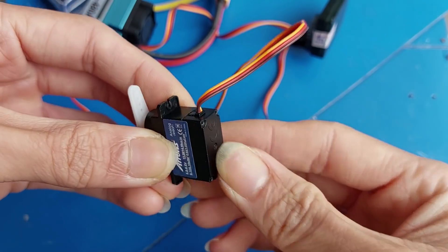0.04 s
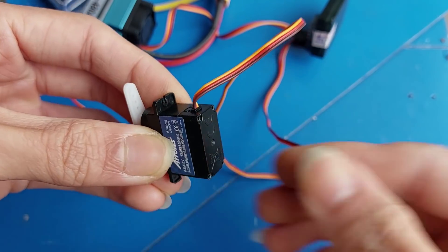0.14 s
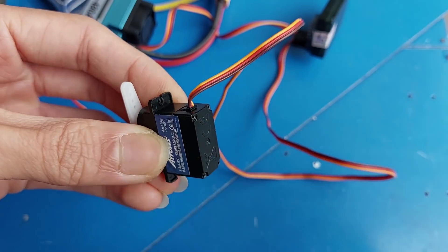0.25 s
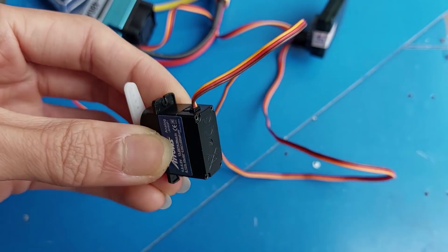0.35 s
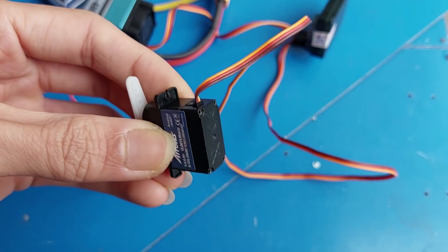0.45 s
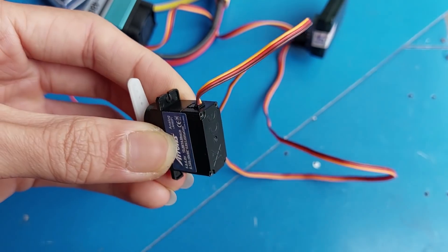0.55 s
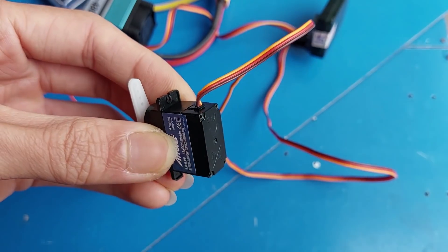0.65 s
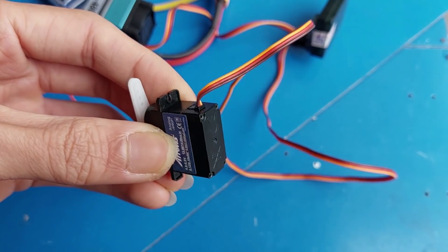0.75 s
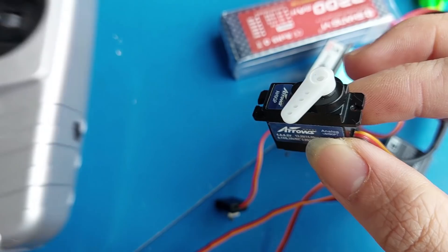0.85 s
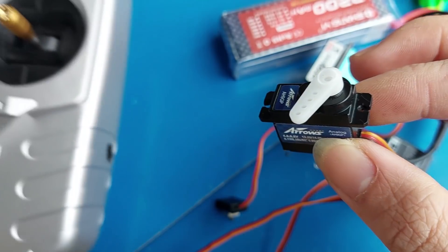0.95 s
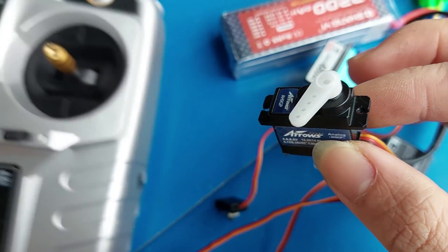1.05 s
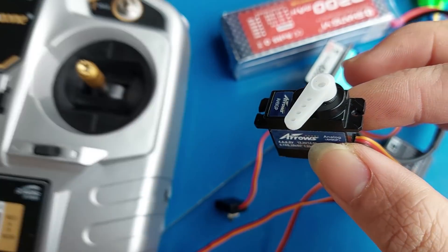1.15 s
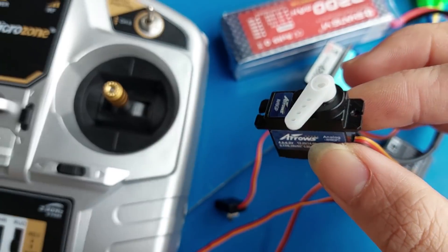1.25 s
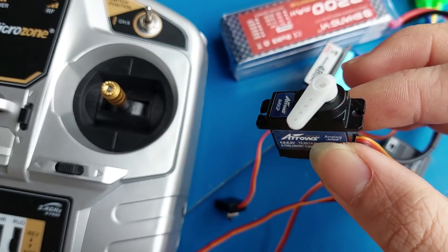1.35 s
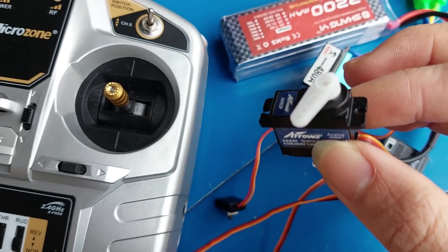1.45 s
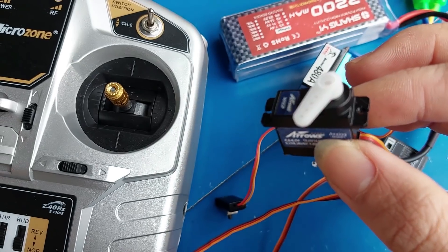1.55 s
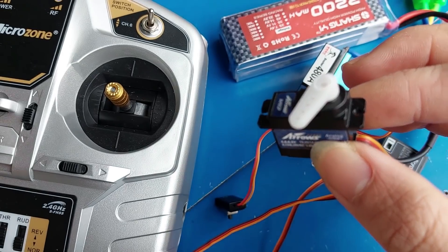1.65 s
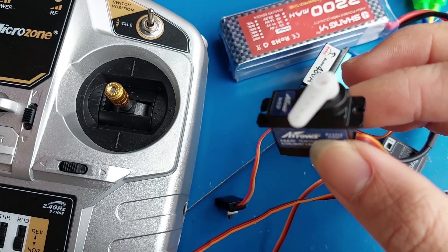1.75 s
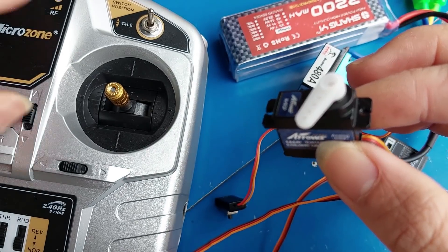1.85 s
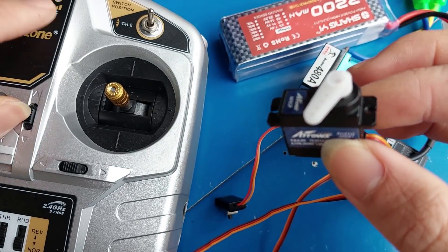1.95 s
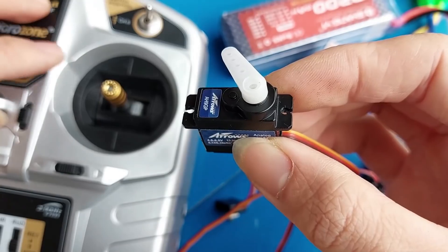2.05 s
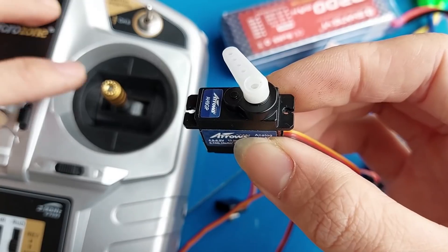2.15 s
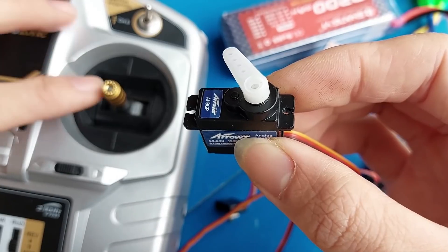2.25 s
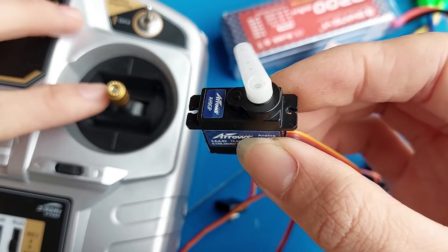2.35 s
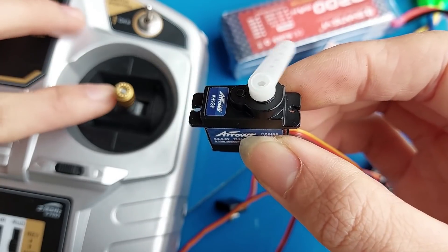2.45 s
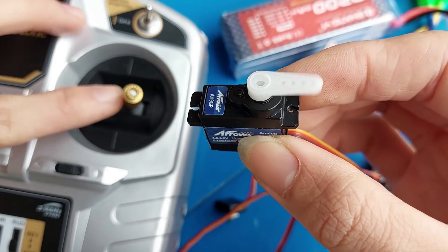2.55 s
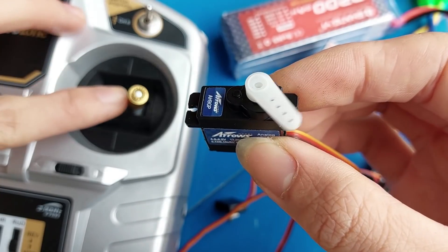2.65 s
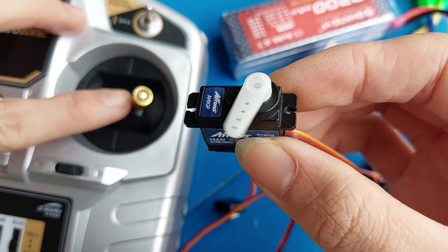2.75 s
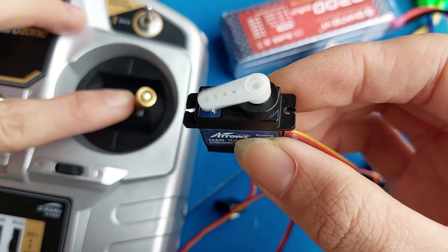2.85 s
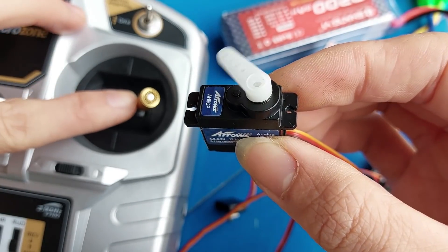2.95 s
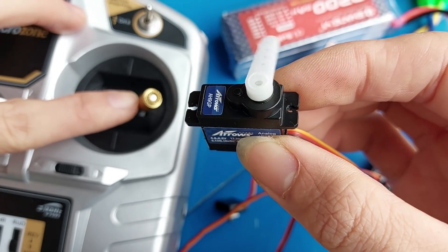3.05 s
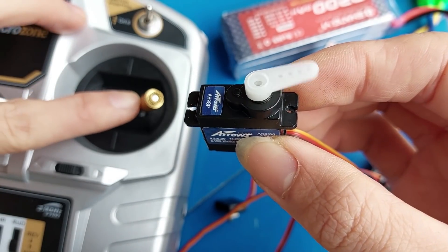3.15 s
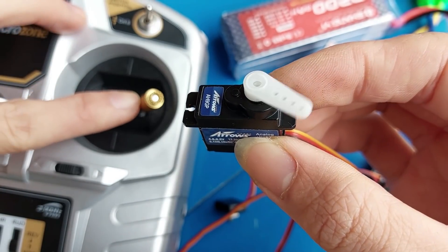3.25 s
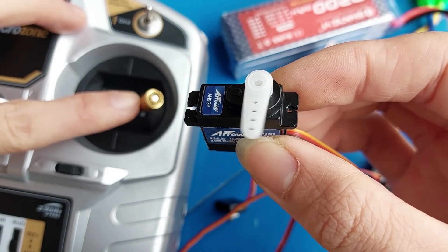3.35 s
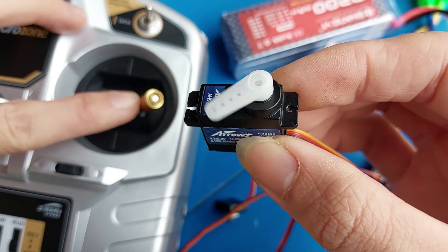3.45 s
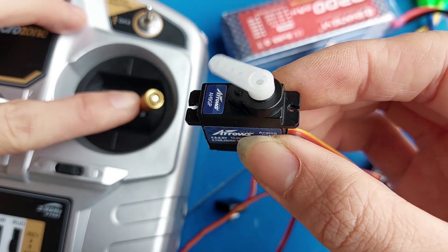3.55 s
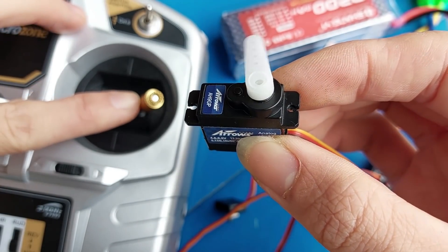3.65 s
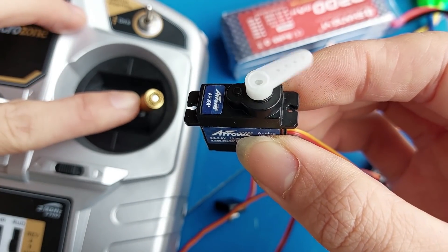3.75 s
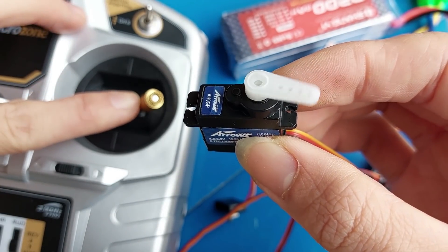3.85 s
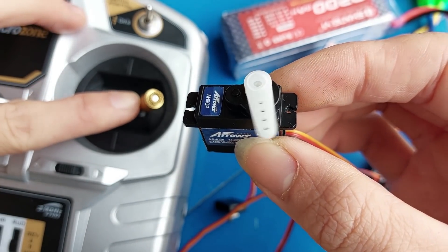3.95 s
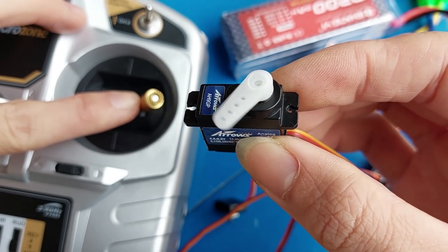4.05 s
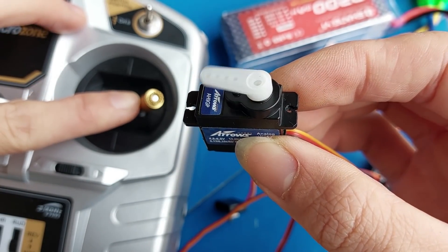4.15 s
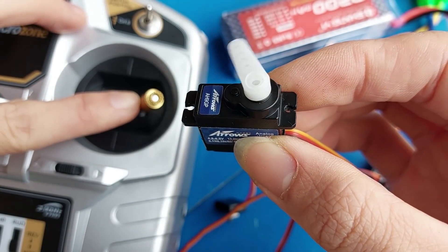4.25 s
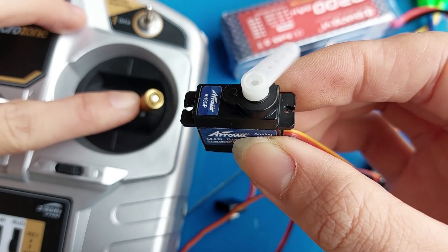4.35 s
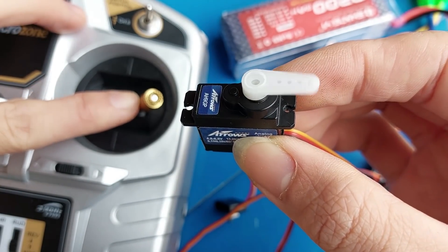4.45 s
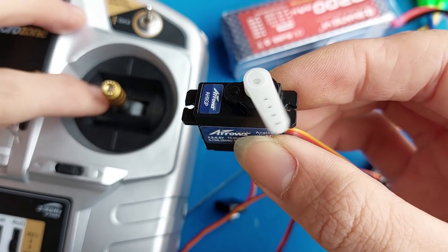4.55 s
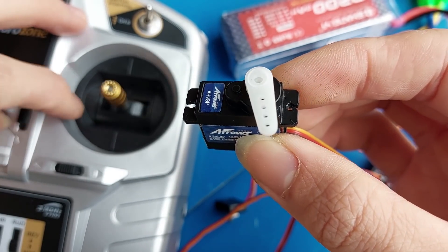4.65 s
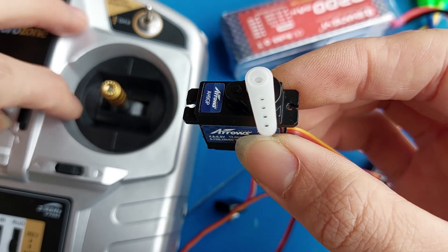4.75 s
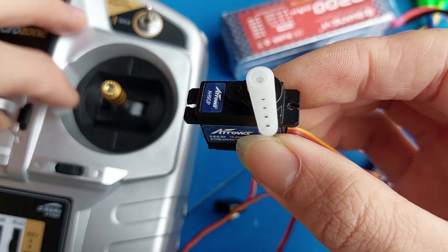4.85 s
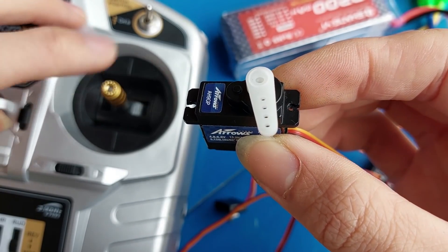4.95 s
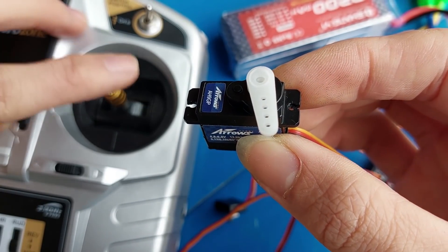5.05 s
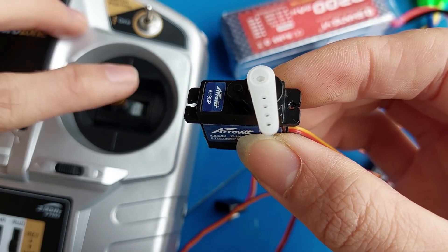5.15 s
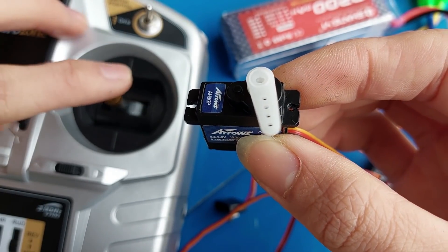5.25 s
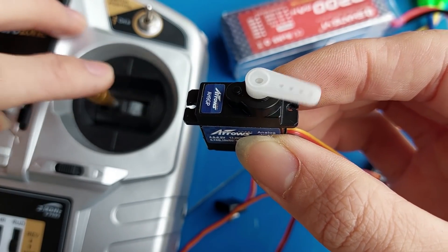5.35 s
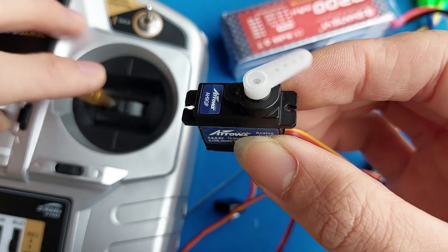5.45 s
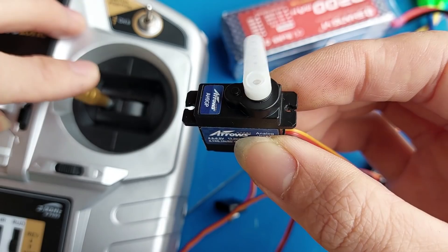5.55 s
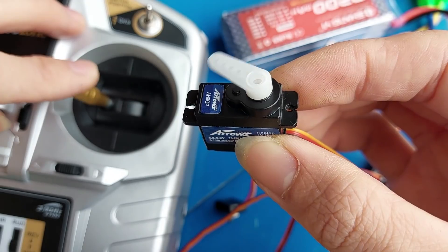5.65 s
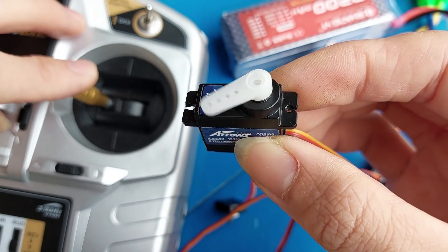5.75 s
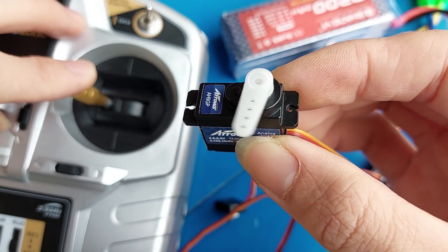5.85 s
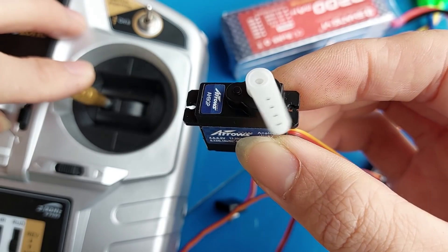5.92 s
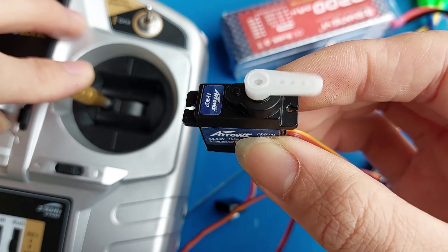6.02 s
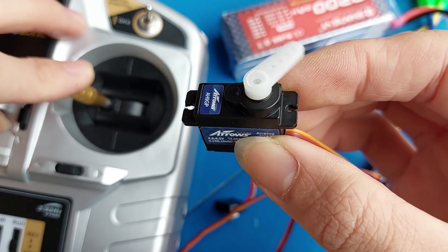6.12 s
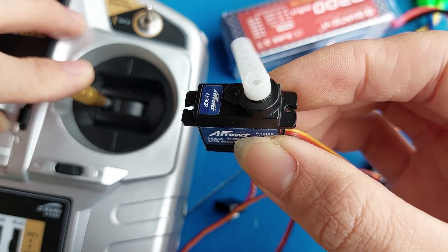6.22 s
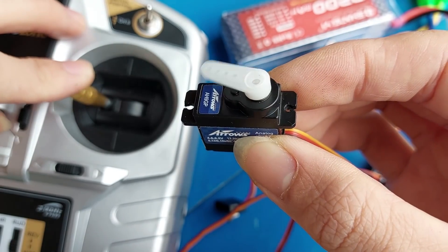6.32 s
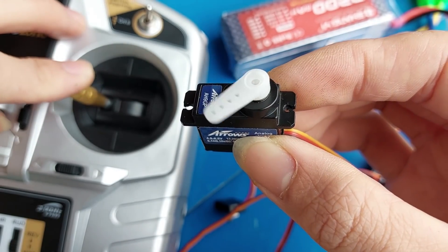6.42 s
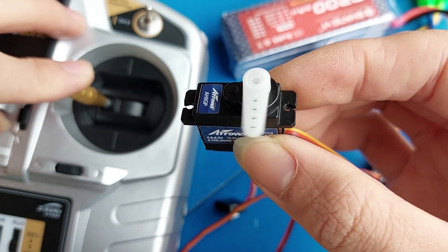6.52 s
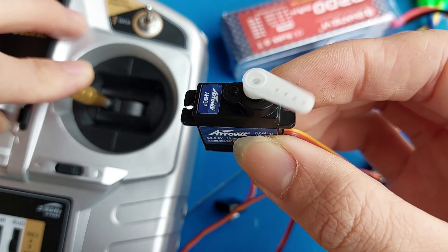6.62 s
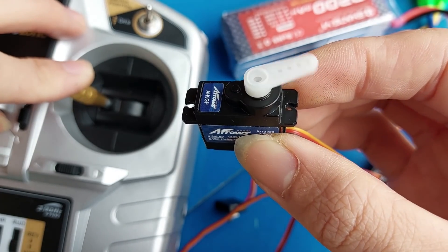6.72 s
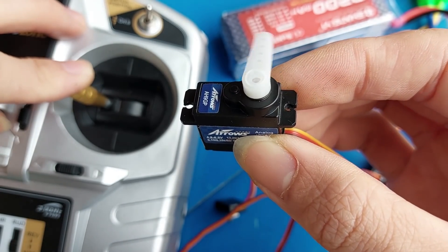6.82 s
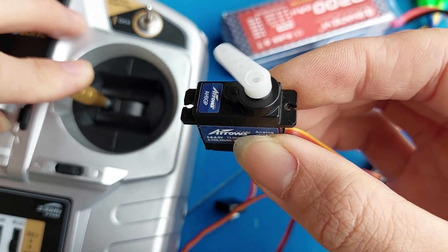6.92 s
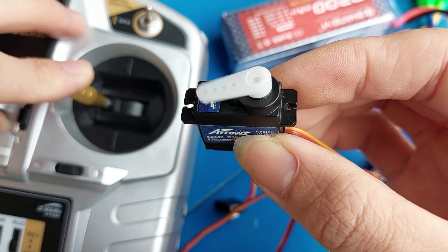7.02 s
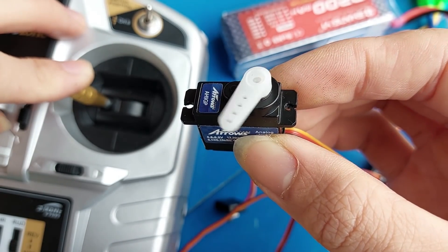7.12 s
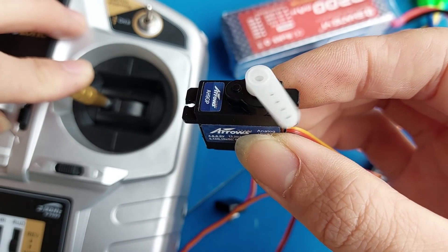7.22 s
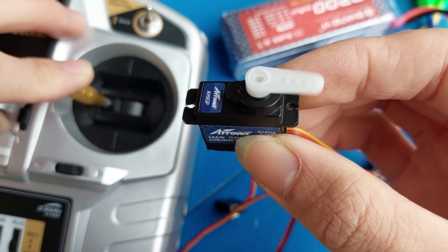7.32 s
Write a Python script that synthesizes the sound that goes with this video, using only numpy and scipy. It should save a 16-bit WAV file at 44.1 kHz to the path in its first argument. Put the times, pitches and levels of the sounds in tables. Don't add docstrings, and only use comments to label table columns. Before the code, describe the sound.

Fingers rustle faintly on a small servo, a plastic transmitter clatters onto a bench, then the motor whines in two steady gritty runs.

```python
import sys
import numpy as np
from scipy import signal
from scipy.fft import rfft, irfft, next_fast_len
from scipy.io import wavfile
from scipy.ndimage import uniform_filter1d

SR = 44100
rng = np.random.default_rng(int(sys.argv[2]) if len(sys.argv) > 2 else 0)


def gain_from_db(level_db):
    decades = np.asarray(level_db, float) / 20
    return 10 ** decades


def persist_wave(psi):
    counts = np.round(np.clip(psi, -1, 1) * 32767).astype(np.int16)
    wavfile.write(sys.argv[1], SR, np.atleast_2d(counts).T)


N = 325458
T = np.arange(N) / SR
CUT_S = (.753, .833)

# f/Hz, density/dB per Hz
ROOM_TONE = [
    [(30, -5), (50, -4), (90, 4), (160, -6.5), (260, -13), (400, -11), (600, -18.5)],
    [(30, -20.5), (50, -9.5), (90, -1), (160, 2), (260, -6.5), (400, -8), (600, -12.5)],
]
RUSTLE = [
    [(700, -7.5), (1000, -3.5), (1400, 1), (2000, -5.5), (2600, -1), (3200, -10.5), (4000, -12.5)],
    [(700, 4.5), (1000, -0.5), (1400, -3.5), (1800, -0.5), (2400, -9), (3200, -9.5), (4000, -17)],
]
FINE_HISS = [
    [(4500, 1), (6000, -2.5), (8000, 0), (10000, -2), (12500, 0), (15500, -6)],
    [(4500, -3), (6000, -5), (8900, -2), (9400, 2), (11000, 1), (13000, -4.5), (15500, -3.5)],
]
# t/s, length/s, rumble/dB, rustle/dB, fine hiss/dB
HANDS = [(.17, 0.34, -65.5, -69.5, -72), (.7, 0.45, -63.5, -78.5, -81.5), (1.15, 0.3, -56.5, -70, -76),
         (1.5, 0.12, -61, -60, -74.5), (1.92, 0.17, -60.5, -66, -80), (1.68, 0.13, -62, -66.5, -76.5),
         (2.3, 0.096, -64.5, -65.5, -78), (2.45, 2, -61.5, -84, -91), (4.61, 0.011, -57, -65, -74),
         (4.72, 0.57, -91, -82.5, -97), (4.99, 0.098, -86.5, -85, -90), (5.42, 1.9, -62.5, -84, -82),
         (6.08, 0.062, -84, -75, -95), (7.24, 0.025, -81, -62, -95)]
STILL_DB, HAND_FADE_DB_S = (-67.5, -76, -84.5), 110

# t/s, length/s, first f/Hz, last f/Hz, level/dB
IDLE = [
    [(.1, 0.47, 2695, 2750, -80), (.54, 0.11, 2710, 2705, -91), (2.06, 0.16, 1600, 1610, -76),
     (5.06, .17, 1860, 1830, -81.5)],
    [(.4, 0.21, 1290, 1244, -84), (5.09, .11, 2860, 2840, -89)],
]
# t/s, length/s, first f/Hz, last f/Hz, level/dB
CHIRPS = [(.471, 0.012, 4550, 4250, -61.5), (.487, 0.0094, 3880, 5000, -60), (.5, 0.017, 5030, 4950, -69),
          (.524, 0.013, 5300, 6700, -72), (.54, 0.047, 6430, 5400, -75), (.86, .1, 3250, 3150, -92),
          (.983, .012, 8700, 7800, -81.5), (1.06, .025, 4930, 5100, -81), (1.52, .014, 4780, 4950, -72),
          (1.915, 0.014, 8500, 7740, -74), (1.98, 0.021, 5090, 5000, -82)]

# t/s, peak/dB, thud re peak/dB, rim re peak/dB, crack re peak/dB, left - right/dB
KNOCKS = [
    (1.1302, -22.5, -10.5, -2.5, -4, 5),
    (1.139, -30, 9, -2, -21.5, -1),
    (1.1499, -34.5, 1.5, 0, -18.5, 1.5),
    (1.2345, -18.5, -10, 4, 0.5, 3.5),
    (1.253, -32.5, -4, 2.5, -20.5, -4),
    (1.296, -14.5, -11.5, -0.5, -10.5, 6),
    (1.305, -19, -11, -1, -12, 4.5),
    (1.3596, -17.5, -7.5, -0.5, -5.5, -2.5),
]
# t/s, peak/dB
THUMPS = [
    (0.948, -55.5),
    (1.189, -32),
    (1.353, -23.5),
    (2.306, -51),
    (2.333, -54),
    (2.345, -47.5),
    (4.608, -45.5),
    (4.635, -50),
]
# f/Hz, level/dB, t60/s
SHELL = [(184, -20.5, 0.048), (300, -5.5, 0.087), (445, -7, 0.033), (556.5, 1, 0.044), (760, 2, 0.036),
         (870, -4, 0.049), (1109, -5.5, 0.04)]
PLATE = [(1610, -4, .025), (1732, -1, 0.027), (2190, -0.5, 0.023), (1290, -12, .015)]
RIM = [(2370, -6.5, 0.015), (2604, 5, 0.013), (2783, -6, .015), (3210, -12, 0.0057)]
EDGE = [(3940, -4.5, 0.011), (4400, -4.5, 0.0068), (4970, -3.5, .01), (5700, -1.5, 0.0082),
        (6070, -6.5, .007), (6700, -5.5, .008), (7600, -13.5, 0.006), (8200, -10.5, .005),
        (9420, -13.5, .005), (10500, -16.5, .006), (11500, -20.5, .005), (12300, -21.5, .005),
        (14200, -17.5, .004)]
# t/s, length/s, low/dB, high/dB
DRAG = [
    (1.132, 0.026, -36, -41),
    (1.17, 0.058, -41.5, -41.5),
    (1.24, 0.045, -34.5, -39.5),
    (1.3, 0.012, -31.5, -36.5),
    (1.365, 0.014, -44, -52),
    (1.4, 0.027, -66.5, -55.5),
]
# f/Hz, density/dB per Hz
DRAG_COLOUR = [(120, -5.5), (200, 0.5), (300, 6), (500, 2), (800, 1), (1150, -6), (1400, -7), (2000, -14),
               (2700, -11.5), (3300, -20.5), (4500, -19.5), (6000, -27), (8000, -38), (13000, -42.5)]
# t/s, peak/dB, f/Hz, crack re peak/dB, left - right/dB
TICKS = [(1.4843, -48.5, 1780, -3, 8), (1.504, -50, 1910, -2, 5), (1.5425, -24, 1724, -21.5, 3),
         (1.559, -36.5, 1550, -29, 4), (1.6055, -31, 1650, -26, 1.5), (1.648, -35.5, 1620, -27, 3),
         (1.671, -42, 1610, -30, 4), (1.699, -42, 1640, -33, -1), (1.7104, -58, 1470, -21, 2.0),
         (1.738, -41.5, 1610, -37, 3), (1.7602, -50, 1630, -38, 11), (1.8, -46.5, 1610, -32.5, 4),
         (1.8203, -52, 1640, -29, 8), (1.936, -46.5, 1730, -7.5, 7), (1.9486, -43, 1630, -28, 9),
         (2.017, -52.5, 2080, -20, 5.5), (2.028, -42.5, 1900, -26, 7), (2.2753, -38.5, 1870, -17, 3),
         (2.3054, -56, 1817, -15, 0.0), (2.3334, -32, 1920, -14, 7), (2.338, -46, 1910, -25, 6),
         (2.3443, -33.5, 1910, -12, 5), (2.378, -51, 1910, -20, 12), (4.609, -39, 1910, -14, 3),
         (4.633, -34, 1965, -12, 14.5)]
# f re pitch, level/dB, t60/s
TICK = [(1.001, 5, 0.028), (1.3, 2.1, 0.032), (1.77, -12.5, 0.019), (2.39, -11.5, 0.012),
        (3.45, -21.5, 0.0073), (4.25, -21, 0.0052), (.38, -12, 0.057)]
TICK_FREE_S = 0.0027
# f/Hz, phase/rad
PORT_PHASE = [(900, -0.17), (1700, 1.84), (2200, -2), (2700, -0.5), (3300, -1.5), (5500, -1.4), (8000, -1)]

RUNS = [
    (2.402, .019, 4.622, 0.014),
    (5.292, .016, 7.5, .02),
]
# t/s, commutator f/Hz (3 x turn rate)
SPIN = [
    [(2.49, 1871), (2.75, 1876), (3.26, 1871), (3.67, 1877), (3.82, 1877), (3.94, 1884), (4.23, 1875),
     (4.43, 1912), (4.61, 1928)],
    [(5.37, 1856), (5.7, 1867), (6.05, 1876), (6.15, 1834), (6.58, 1841), (7.07, 1831), (7.28, 1860),
     (7.38, 1837)],
]
# t/s, sag/Hz, slowing/s, recovery/s
SAGS = [
    (2.857, 39.7, .11, .07),
    (3.531, 23.91, .3, .14),
    (4.02, 27.08, .08, .2),
    (5.46, 40.9, .03, .24),
    (5.77, 48.04, .07, .28),
    (5.96, 70.26, .1, .09),
    (6.46, 38.64, .08, .12),
    (6.63, 39.18, .05, .44),
    (7.17, 70, .1, .11),
]
# order, run 1 left/dB, right/dB, run 2 left/dB, right/dB
ORDER = [(3, -50, -57, -47, -54), (4, -73, -80, -65, -70), (5, -85, -73, -71, -68), (6, -60, -63, -59, -68),
         (7, -69, -66, -57, -55), (8, -69, -73, -68, -86), (9, -64, -70, -56, -65),
         (10, -58, -72, -63, -65), (11, -69, -70, -65, -61), (12, -61, -70, -64, -70),
         (13, -54, -58, -54, -56), (14, -57, -71, -56, -68), (15, -58, -72, -59, -67),
         (16, -61, -64, -59, -61), (17, -62, -66, -64, -60), (18, -63, -63, -59, -64),
         (19, -57, -61, -65, -58), (20, -48, -51, -58, -55), (21, -55, -70, -50, -65),
         (22, -46, -56, -48, -62), (23, -53, -52, -54, -64), (24, -52, -63, -49, -54),
         (25, -55, -65, -60, -67)]
PORT_LEAD = [(3, 0.2, 0.05), (4, 0.22, 0.18), (5, 0.39, 0.01), (6, -0.43, 0.42), (7, 0.01, -0.0),
             (8, 0.03, -0.07), (9, -0.08, 0.24), (10, 0.15, 0.03), (11, -0.13, -0.11), (12, 0.0, -0.09),
             (13, 0.09, 0.03), (14, 0.23, 0.15), (15, 0.22, 0.19), (16, 0.02, 0.25), (17, 0.38, 0.1),
             (18, -0.43, 0.46), (19, 0.23, 0.05), (20, -0.11, 0.06), (21, -0.01, 0.02), (22, 0.07, 0.38),
             (23, 0.0, 0.45), (24, -0.08, -0.1), (25, -0.28, -0.1)]
# f/Hz, run 1 left/dB, right/dB, run 2 left/dB, right/dB
CASE = [(593, -99, -103.5, -105.5, -107), (1350, -99, -104, -99, -102), (1470, -98, -99, -100.5, -102.5),
        (1600, -90, -94.5, -100.5, -100), (1950, -92.5, -104, -110, -112), (2276, -88.5, -104, -93.5, -102),
        (2950, -81.5, -104, -80.5, -80.5), (2970, -90.5, -93, -88.5, -85), (3260, -87, -89, -88, -88),
        (4060, -91, -92.5, -84, -95.5), (4330, -81.5, -84.5, -84, -89), (4670, -90, -88.5, -87.5, -94),
        (5000, -86, -98, -85, -92), (5300, -81, -104, -82, -104), (5780, -86.5, -108, -84, -101),
        (6610, -79.5, -82, -80.5, -82.5), (8500, -78, -86.5, -75.5, -83.5),
        (10000, -84.5, -83.5, -80.5, -80), (11500, -78, -81, -76, -77.5), (12030, -78.5, -82, -75, -76.5),
        (13420, -75.5, -80.5, -72, -83), (15450, -71.5, -81, -71.5, -80.5)]
# f/Hz, width/Hz, level/dB
RINGS = [
    [(12270, 330, 1), (12860, 150, 4), (13500, 340, 4)],
    [(1520, 240, 2.5), (13050, 220, 3.5), (13560, 170, 2.5), (14700, 420, 4)],
]
# s early, hiss/dB
CREEP = [
    (0.049, -16),
    (0.0033, -30.5),
]
TONE_DB_PER_HZ = 0.0077
SPEED_JITTER = .002
HISS_LAG_S, HISS_RISE_DB_S, HISS_FALL_DB_S = (0.0037, 0.025), 948, 860
HISS_SWELL_DB, HISS_SWELL_S = 6, 0.024
ALIKE = (0.35, 0.35)

TOP_HZ = 15620


def read(table):
    return np.interp(T, *np.transpose(table))


def unit(x):
    return x / np.sqrt(np.mean(x ** 2, axis=-1, keepdims=True))


def colour(x, hz, db):
    size = next_fast_len(x.shape[-1])
    f = np.log(np.fft.rfftfreq(size, 1 / SR) + 1)
    edge = np.log(np.array(hz, float))
    skirt = -40 * (np.maximum(edge[0] - f, 0) + np.maximum(f - edge[-1], 0))
    gain = gain_from_db(np.interp(f, edge, db) + skirt)
    return irfft(rfft(x, size) * gain, size)[..., :x.shape[-1]]


def walk(rate_hz, size=N):
    k = int(SR / rate_hz)
    steps = np.repeat(rng.standard_normal(size // k + 1), k)
    return 0.99 * uniform_filter1d(uniform_filter1d(steps, k), k)[:size]


def bed(spectrum, alike, pan_db, flicker_db, size=N):
    shared, own = rng.standard_normal((2, size))
    pair = np.array([shared, alike * shared + np.sqrt(1 - alike ** 2) * own])
    level_db = np.array([[pan_db], [-pan_db]]) / 2 + flicker_db * walk(12, size)
    return unit(colour(pair, *np.transpose(spectrum))) * gain_from_db(level_db)


def bursts(rows, column, rise_db_s, fall_db_s):
    t = T[::32]
    power = 0
    for row in rows:
        early, late = np.maximum(row[0] - t, 0), np.maximum(t - row[0] - row[1], 0)
        power = power + gain_from_db(row[column] - rise_db_s * early - fall_db_s * late) ** 2
    return np.interp(T, t, np.sqrt(power))


def background():
    cut = int(np.mean(CUT_S) * SR)

    def joined(colours, *settings):
        return np.hstack([bed(colours[0], *settings, size=cut), bed(colours[1], *settings, size=N - cut)])

    busy = [np.hypot(gain_from_db(db), bursts(HANDS, 2 + k, HAND_FADE_DB_S, HAND_FADE_DB_S))
            for k, db in enumerate(STILL_DB)]
    rumble = joined(ROOM_TONE, 0.41, 6.04, 0.84) * busy[0]
    rustle = joined(RUSTLE, 0.05, 2.1, 2.5) * busy[1]
    fine = joined(FINE_HISS, 0.088, 3., 0.76) * busy[2]
    return rumble + rustle + fine


def whistle(notes, waver, fade_db_s):
    hz = read([(s + k * length, ends[k]) for s, length, *ends in notes for k in range(2)])
    phase = 2 * np.pi * np.cumsum(hz * (1 + waver)) / SR
    return bursts(notes, 4, fade_db_s, fade_db_s) * np.sin(phase)


def idle():
    tones = sum(whistle(notes, .008 * walk(120), fade_db_s=148) * gain_from_db(3.8 * walk(43)) for notes in IDLE)
    return tones * gain_from_db(np.array([[2.5], [-2.5]]))


def birds():
    level_db = 2.5 + 4.0 * walk(150) + np.array([[1.5], [-1.5]])
    return whistle(CHIRPS, .0092 * walk(500), fade_db_s=1500) * gain_from_db(level_db)


def add(out, s, modes, peak_db, pan_db, push_ms, scatter, strike=3, count=3, free_s=1):
    t = np.arange(int(min(max(m[2] for m in modes), .07) * SR) + 256) / SR
    modes = list(modes) * count
    hz, db, t60 = np.transpose(modes)[:, :, None]
    chance = rng.standard_normal((4, len(modes), 1))
    push = rng.standard_normal(256) * np.exp(-t[:256] * 1000 / push_ms)
    push[0] = strike
    phase = 2 * np.pi * hz * (1 + .008 * count * chance[0]) * t + (count - 1) * chance[1]
    port = scatter * chance[3] - np.interp(hz, *np.transpose(PORT_PHASE))
    level = gain_from_db(db + 1.8 * chance[2])
    decay = 1000 ** (-t / t60)
    shape = np.minimum(t / .00025, 1) * gain_from_db(np.clip((free_s - t) * 12000, -11, 0))
    start = int(s * SR)
    for ch in range(2):
        ring = (level * np.sin(phase + ch * port) * decay).sum(axis=0)
        ring = np.convolve(ring * shape, push)[:len(t)]
        out[ch, start:start + len(t)] += ring / np.abs(ring).max() * gain_from_db(peak_db + pan_db * (.5 - ch))


def transmitter():
    out = np.zeros((2, N))
    for s, db, thud_db, rim_db, crack_db, pan_db in KNOCKS:
        add(out, s, SHELL, db + thud_db + 5, 0, push_ms=0.9, scatter=0.56)
        add(out, s, PLATE, db + 3.5, pan_db, push_ms=0.23, scatter=0.74)
        add(out, s, RIM, db + rim_db + 2, pan_db / 3, push_ms=0.46, scatter=0.45, strike=5.0)
        add(out, s, EDGE, db + crack_db + 9.5, pan_db, push_ms=0.37, scatter=.9, strike=5.3, count=4)
    for s, db in THUMPS:
        add(out, s, SHELL, db, 0, push_ms=7.3, scatter=0.25, strike=1.1)
    for s, db, hz, crack_db, pan_db in TICKS:
        part = [(k * hz, *ring) for k, *ring in TICK]
        add(out, s, part, db + 0.5, pan_db, push_ms=0.054, scatter=0.36, strike=9.3, count=1,
            free_s=TICK_FREE_S)
        add(out, s, EDGE, db + crack_db + 1.5, pan_db, push_ms=0.094, scatter=1.8)
    span = slice(SR, 2 * SR)
    low = bed(DRAG_COLOUR[:6], alike=0.8, pan_db=-0.5, flicker_db=1.0, size=SR)
    high = bed(DRAG_COLOUR[6:], alike=0.34, pan_db=-0.5, flicker_db=7.0, size=SR)
    out[:, span] += low * bursts(DRAG, 2, 4000, 500)[span]
    out[:, span] += high * bursts(DRAG, 3, 4000, 400)[span] * gain_from_db(-3)
    return signal.sosfilt(signal.butter(2, 110, "high", fs=SR, output="sos"), out)


def gears(turns, nine=0.606, eleven=0.43, gate=0.14):
    marks = []
    for k in (9, 11):
        wear = rng.standard_normal(64 * k)
        marks.append(np.interp(turns * 64 % (64 * k), np.arange(64 * k), wear))
    pulse = (1 + gate * np.cos(2 * np.pi * turns)) * gain_from_db(2.2 * walk(400, len(turns)))
    return (rng.standard_normal(len(turns)) + nine * marks[0] + eleven * marks[1]) * pulse


def lead(x, run, turn_hz):
    size, ports = next_fast_len(len(x)), np.array(PORT_LEAD)
    order = np.fft.rfftfreq(size, 1 / SR) / turn_hz
    cycles = np.interp(order, ports[:, 0], np.unwrap(ports[:, 1 + run], period=1))
    return irfft(rfft(x, size) * np.exp(2j * np.pi * cycles), size)[:len(x)]


def tooth_swell(run, t, span, speed):
    start, _, stop, _ = RUNS[run]
    engaged = start + HISS_LAG_S[run]
    early_s, creep_db = CREEP[run]
    held = [(engaged, stop + 0.013 - engaged, 0), (start - early_s, early_s + .03, creep_db)]
    fill_db = -HISS_SWELL_DB * np.exp(-np.maximum(t - engaged, 0) / HISS_SWELL_S)
    level_db = fill_db + 1.7 * (speed - 1) + .5 * walk(5.1, len(t))
    return bursts(held, 2, HISS_RISE_DB_S, HISS_FALL_DB_S)[span] * gain_from_db(level_db)


def tooth_hiss(run, turn, turn_hz, swell):
    case = np.array(CASE, float)
    near = gears(turn / (2 * np.pi))
    own = gears(turn / (2 * np.pi))
    far = ALIKE[run] * lead(near, run, turn_hz) + np.sqrt(1 - ALIKE[run] ** 2) * own
    out = []
    for ch, teeth in enumerate((near, far)):
        rings = sum(gain_from_db(db) * signal.lfilter(*signal.iirpeak(hz, hz / width, SR), teeth)
                    for hz, width, db in RINGS[run])
        out.append(colour(teeth + rings, case[:, 0], case[:, 1 + 2 * run + ch]) * gain_from_db(40.5) * swell)
    return np.array(out)


def shaft_whine(run, turn, tone, speed, swell, side=0.1, under=0.042, play=0.41, drift_db=0.27):
    size = len(turn)
    out = np.zeros((2, size))
    slow, quick = gain_from_db(drift_db * walk(6.9, size)), play * walk(220, size)
    wobble = 1 + side * np.exp(1j * turn / 11) + under * np.exp(-1j * turn / 11)
    labour = gain_from_db(TONE_DB_PER_HZ * (tone - np.median(tone)))
    for (k, *heard_db), port in zip(ORDER, PORT_LEAD):
        shift = rng.integers(size)
        if k > 3:
            smear = wobble + (k + 7) / 25 * np.roll(quick, shift)
            level = swell * np.roll(slow, shift) * smear * speed ** 5
        else:
            level = labour * slow * speed ** 14
        line = level * np.exp(1j * (k * turn + shift))
        out[0] += gain_from_db(heard_db[2 * run] + 5.5) * line.real
        out[1] += gain_from_db(heard_db[2 * run + 1] + 2.0) * (line * np.exp(2j * np.pi * port[1 + run])).real
    return out


def servo():
    out = np.zeros((2, N))
    sag = sum(np.interp(T, [s - fall, s, s + back], [0, hz, 0]) for s, hz, fall, back in SAGS)
    for run, (start, rise, stop, brake) in enumerate(RUNS):
        span = slice(int((start - .09) * SR), int((stop + 0.16) * SR))
        t = T[span]
        spin_up = 1 - np.exp(-np.maximum(t - start, 0) / rise)
        speed = spin_up * np.exp(-np.maximum(t - stop, 0) / brake)
        tone = (read(SPIN[run]) - sag)[span] * (1 + SPEED_JITTER * walk(45, len(t)))
        turn = 2 * np.pi * np.cumsum(tone / 3 * speed) / SR
        swell = tooth_swell(run, t, span, speed)
        out[:, span] += tooth_hiss(run, turn, np.median(tone) / 3, swell)
        out[:, span] += shaft_whine(run, turn, tone, speed, swell)
    return out


def room(x, t60=0.43, wet_db=-22):
    t = np.arange(SR // 3) / SR
    tail = rng.standard_normal((2, len(t))) * 1000 ** (-t / t60) * (t > .002)
    tail = unit(tail) / np.sqrt(len(t))
    return x + gain_from_db(wet_db) * signal.fftconvolve(x, tail, axes=1)[:, :N]


def scene():
    far = room(idle() + birds())
    bench = room(transmitter(), t60=0.27, wet_db=-22)
    return background() + far + bench + room(servo(), wet_db=-49.5)


def top_cut(x):
    return signal.sosfilt(signal.butter(12, 15960, fs=SR, output="sos"), x)


def record(dry):
    gap = np.clip(np.maximum(CUT_S[0] - T, T - CUT_S[1]) / 0.013, 0, 1)
    top = signal.ellip(10, .2, 60, TOP_HZ, fs=SR, output="sos")
    mix = signal.sosfilt(top, dry) * gap
    return top_cut(mix)


dry = scene()
out = record(dry)
persist_wave(out)
```